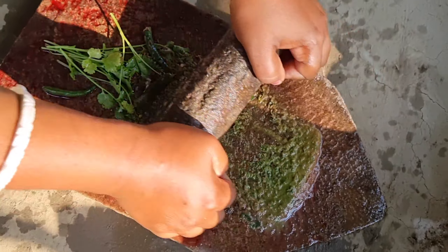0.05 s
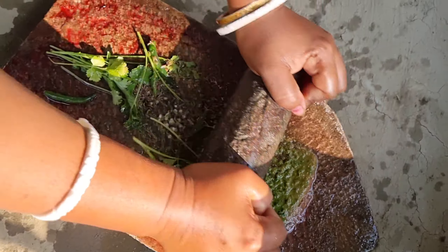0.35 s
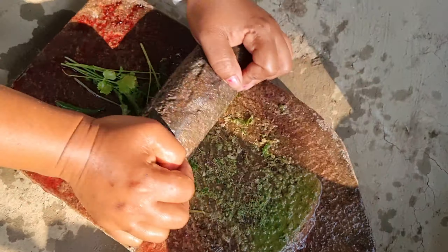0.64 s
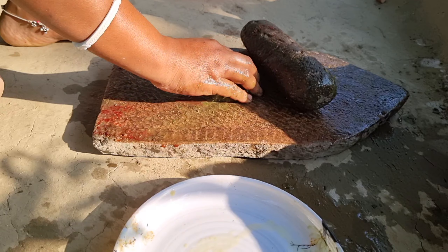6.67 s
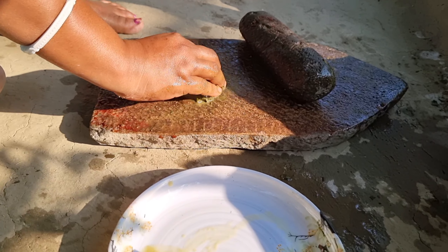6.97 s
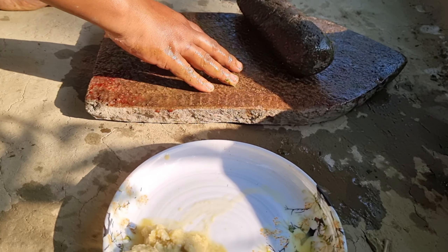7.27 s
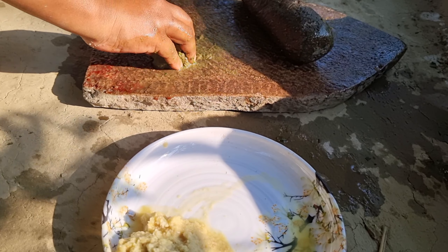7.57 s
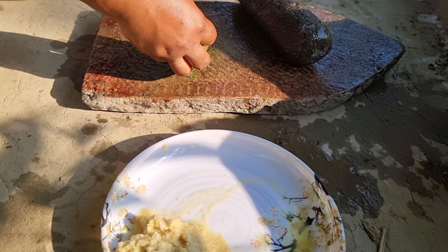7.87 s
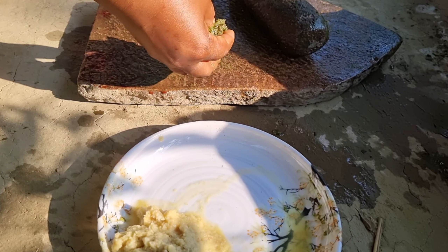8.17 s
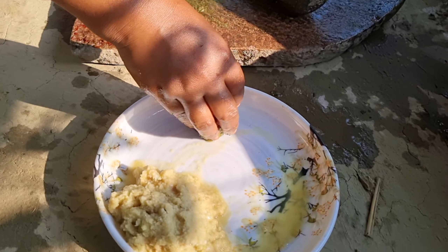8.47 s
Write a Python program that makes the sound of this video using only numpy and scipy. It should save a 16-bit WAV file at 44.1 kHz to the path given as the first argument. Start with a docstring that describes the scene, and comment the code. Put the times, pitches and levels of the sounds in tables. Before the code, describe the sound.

Quick, hissing scrapes of stone on stone crush herbs and spices outdoors, followed by a soft wet wipe and a faraway engine.

```python
"""Gritty, hissing strokes over faint outdoor air and a low hum: a stone roller grinds wet herbs and
spices on a stone slab. The stones judder and ring, seeds crack, the slab rumbles on the ground.
After a pause with a thin whistle and a few nudges, grinding resumes, heard from a second close
position, and the paste squelches. Then it stops: a slow single-cylinder engine thumps far away
and a hand wipes the wet slab."""
import sys
import numpy as np
from scipy import signal
from scipy.fft import rfft, irfft
from scipy.io import wavfile

SR = 44100
rng = np.random.default_rng(int(sys.argv[2]) if len(sys.argv) > 2 else 0)


def generate_wav(sig):
    """Save sig (samples, or channels by samples) to the path in sys.argv[1] as 16-bit PCM at SR."""
    pcm = np.round(np.clip(np.atleast_2d(sig).T, -1, 1) * 32767).astype(np.int16)
    wavfile.write(sys.argv[1], SR, pcm)


N = 380136
T = np.arange(N) / SR
BREAK_S, RESUME_S, STOP_S = 2.605, 2.646, 5.652
CUTOFF_HZ = 16000

# Outdoor air. Each row: frequency in Hz, relative level in dB.
AIR_SPECTRUM = [(25, -19), (65, 3.5), (130, -3.5), (200, -9.5), (300, -7.5), (560, -22), (900, -24.5),
                (1250, -22.5), (1900, -25), (2600, -24.5), (3300, -29.5), (4200, -27), (5800, -36),
                (7200, -29.5), (9200, -45), (16000, -45)]
# Air loudness. Each row: time in seconds, level in dB.
AIR_ENVELOPE = [(0, -50.5), (5.7, -56.5), (6.6, -58.5), (6.75, -66), (7.4, -63), (7.7, -59.5), (8.0, -64.5),
                (8.62, -61)]
# Hum loudness. Each row: time in seconds, level in dB.
HUM_ENVELOPE = [(0, -46), (0.6, -46), (2.3, -38), (2.85, -38), (3.5, -38.5), (4.6, -39), (4.9, -47),
                (5.65, -39)]
# Strokes at listening positions A and B, push and pull in turn. Each row: start in seconds,
# length in seconds, then grit hiss, stone ring and ground rumble in dB.
ROLLER_STROKES_A = [(0.08, 0.091, -23, -34, -29), (0.24, 0.135, -26.5, -37, -37.5),
                    (0.632, 0.088, -23, -40.5, -35.5), (0.786, 0.087, -21, -30, -34),
                    (1.106, 0.097, -24.5, -40, -33.5), (1.288, 0.11, -22, -35, -33.5),
                    (1.601, 0.12, -24, -40.5, -35.5), (1.776, 0.13, -21.5, -33, -35),
                    (2.119, 0.097, -21, -37.5, -32.5), (2.282, 0.119, -18.5, -32, -33.5),
                    (2.576, 0.14, -24.5, -36.5, -31.5)]
ROLLER_STROKES_B = [(3.061, 0.17, -32.5, -50.5, -35), (3.312, 0.083, -26, -37.5, -36),
                    (3.568, 0.086, -27, -38, -33), (3.762, 0.1, -21, -35.5, -34.5),
                    (4.06, 0.094, -25.5, -42, -31.5), (4.262, 0.088, -21, -36.5, -34.5),
                    (4.546, 0.13, -26, -38, -31.5), (4.72, 0.093, -20.5, -34, -33.5),
                    (5.009, 0.13, -29, -40, -38), (5.215, 0.11, -25, -41, -38.5),
                    (5.507, 0.15, -26.5, -41.5, -38.5)]
# Shape of a push, then a pull. Each row: hiss attack and release in dB per second,
# then the fractions of the stroke at which ring and rumble peak.
STROKE_SHAPES_A = [(280, 629.5, 0.24, 0.3), (390, 252, 0.59, .8)]
STROKE_SHAPES_B = [(193.2, 200, 0.55, 0.36), (256, 213, 0.65, 0.8)]
# Slab and roller modes. Each row: frequency in Hz, width in Hz, left and right gain in dB at A,
# left and right gain in dB at B.
STONE_MODES = [(459.7, 120, -14.5, -12, -11.5, -17), (647, 90, -16, -11.5, -5, -8),
               (747, 130, -16.5, -14, -10, -13.5), (1112.5, 50, 2, 2.5, -8.5, 7),
               (1185, 180, -8.5, -11, -8, -3.5), (1380, 79, -8, -10.5, -9.5, -5),
               (1790, 340, -17.5, -18.5, -17, -11), (2695, 40, -9.5, -18.5, -16.5, 1.5),
               (2905, 85, -11, -16.5, -15.5, 2.5), (4610, 170, -6.5, -23, -27, 3.5),
               (7370, 500, -27.5, -35.5, -52, -40.5)]
# Stone catches on bare stone. Each row: start in seconds, length in seconds, level in dB,
# contact pitch in Hz.
STONE_CATCHES = [(0.062, 0.013, -12.5, 1076), (0.073, 0.021, -11, 1090), (0.131, 0.0088, -8, 1300),
                 (0.142, 0.033, -11.5, 1120), (0.1844, 0.011, -12, 1200), (0.295, 0.02, -25, 1366),
                 (0.3713, 0.0027, -13, 2170), (0.672, 0.0069, -25.5, 1200), (1.61, 0.011, -30.5, 1100),
                 (2.289, 0.011, -21.5, 1510), (2.307, 0.021, -25, 1400), (3.052, 0.048, -21, 633),
                 (3.117, 0.011, -22.5, 1140), (3.556, 0.023, -26.5, 600), (4.594, 0.014, -20.4, 1360),
                 (4.649, 0.0087, -26, 1340), (5.012, 0.0031, -25, 1330), (5.063, 0.0042, -26.5, 1290),
                 (5.199, 0.016, -17.5, 1330)]
# Grit hiss. Each row: frequency in Hz, relative left and right level in dB.
GRIT_SPECTRUM_A = [(301, -42.5, -44), (1510, -27, -28), (2134, -16, -15.5), (2800, -9.5, -19.5),
                   (3320, -9.5, -16.5), (4294, -2, -17.5), (6740, -2.14, -16), (8100, -10.5, -19),
                   (8500, -31.5, -20), (9530, -24, -24), (12300, -10, -26.5), (15610, -9.5, -26.5)]
GRIT_SPECTRUM_B = [(298.2, -30.5, -52), (1480, -28.5, -34.5), (2364, -21, -15.5), (2830, -22.5, -14.5),
                   (3770, -24, -6), (3970, -31, -0.7), (5130, -19.5, -2), (6200, -28.5, -16.5),
                   (7460, -21, -34), (9420, -34.5, -25.5), (11850, -28.5, -13), (15500, -37, -22)]
# Slab on the ground. Each row: frequency in Hz, relative level in dB.
RUMBLE_SPECTRUM = [(30, -34.5), (50, -11.5), (80, -2), (130, -2), (195, 0), (235, -10), (290, -20),
                   (400, -18), (800, -51)]
# Coarse spice gives way. Each row: start in seconds, length in seconds, hiss level in dB.
SPICE_CLUMPS = [(0.13, 0.01, -22), (0.256, 0.015, -32), (0.404, 0.053, -32), (1.198, 0.05, -30.5),
                (1.7, 0.02, -22), (2.194, 0.026, -20), (3.057, 0.078, -28.5), (3.911, 0.019, -32),
                (4.607, 0.005, -24.5), (5.435, .022, -29), (5.598, 0.036, -23.5)]
# Seeds and grit snap. Each row: start in seconds, level in dB, brightness in dB.
SEED_CRACKS = [(0.227, -18, 9), (0.2507, -11, 1), (0.252, -11.5, -3), (0.315, -16, 0), (0.4426, -14, 23),
               (0.634, -23, -7), (0.8395, -18, -8), (0.8918, -20, 15), (0.895, -15.5, 13), (1.105, -21, 12),
               (1.6222, -14.5, 13), (1.7992, -15, -8), (2.253, -16, 1), (3.2021, -23.5, 16),
               (3.3038, -17.5, -19), (3.3245, -17.5, -24), (3.3384, -20, 1), (3.3685, -14.5, 9),
               (3.528, -24.5, -24), (3.9214, -18, 8.5), (4.0089, -27.5, -8), (4.105, -21, -3),
               (4.247, -16, 5), (4.41, -24, 1), (4.6, -15, -25), (4.8398, -11, 13), (5.2309, -14, -23),
               (5.437, -28, -23), (5.448, -25, -20), (5.6192, -23, -5)]
# Whistle loudness. Each row: time in seconds, level in dB.
WHISTLE_ENVELOPE = [(2.65, -60), (2.69, -46), (2.735, -60), (2.77, -44), (2.88, -47), (2.98, -53),
                    (3.02, -85)]
# The roller is settled on the slab. Each row: start in seconds, level in dB.
ROLLER_NUDGES = [(2.744, -32.5), (2.813, -39), (2.847, -38), (2.895, -40)]
# Wet paste crackle. Each row: frequency in Hz, relative level in dB.
WET_SPECTRUM = [(700, -26), (1300, -6), (1900, -4), (3000, -8.5), (5500, 1.5), (7500, -2), (9500, -8),
                (13000, -2), (16000, -11)]
# Paste squelches as the roller turns back. Each row: start in seconds, length in seconds,
# first and last pitch in Hz, level in dB.
PASTE_SQUELCHES = [(3.244, 0.06, 1700, 2050, -49), (3.924, 0.066, 2700, 2070, -49),
                   (5.385, 0.048, 2700, 2090, -49)]
# Engine speed. Each row: time in seconds, firings per second.
FIRING_RATE = [(5.735, 9.0), (6.2, 8.36), (7.0, 8.31), (7.55, 9.18), (8.25, 8.99), (8.6, 10.12)]
# The distant engine's loudness dips suddenly, then recovers.
# Each row: time in seconds, exhaust thump in dB, silencer ring in dB.
ENGINE_ENVELOPE = [(5.7, -50.5, -51), (6.57, -54, -50), (6.7, -61.5, -62), (7.15, -52.5, -56),
                   (8.15, -55, -58.5), (8.6, -54, -58.5)]
# Hand on the slab. Each row: peak time in seconds, rise and fall in dB per second, level in dB.
HAND_WIPES = [(6.22, 99, 108, -50), (6.228, 600, 700, -49), (6.278, 1200, 500, -45.5),
              (6.58, 251, 201, -74), (7.73, 242, 131, -72)]


def from_db(db):
    """Decibels to gain."""
    return 10 ** (np.asarray(db) / 20)


def unit_rms(x):
    """Scale to unit power."""
    return x / np.sqrt(np.mean(x ** 2) + 1e-20)


def envelope(rows):
    """Gain curve from rows of seconds and dB."""
    return from_db(np.interp(T, *np.transpose(rows)))


def during(start_s, end_s, ramp_s=0.004):
    """Gate with short ramps."""
    return np.clip(np.minimum(T - start_s, end_s - T) / ramp_s, 0, 1)


def held_db(start_s, length_s, attack_db_per_s, release_db_per_s):
    """Attack, hold at 0 dB, release."""
    early_s, late_s = np.maximum(start_s - T, 0), np.maximum(T - start_s - length_s, 0)
    return -attack_db_per_s * early_s - release_db_per_s * late_s


def power_sum(curves_db):
    """Joint gain of unrelated sounds."""
    return np.sqrt(sum(from_db(np.maximum(curve, -200)) ** 2 for curve in curves_db))


def drift(rate_hz):
    """Slow random curve of unit spread."""
    points = rng.standard_normal(N // 8)
    return np.interp(T * rate_hz, np.arange(len(points)), points) * np.sqrt(3 / 2)


def delay(x, lag_s):
    """Delay a mono signal; a negative lag advances it."""
    return np.interp(T - lag_s, T, x)


def late_left(x, lag_s):
    """Sound from the right reaches the left side later; negative for sound from the left."""
    return np.array([delay(x[0], lag_s), x[1]])


def cut(x, hz, kind):
    """Second-order low- or high-pass."""
    return signal.sosfilt(signal.butter(2, hz, kind, fs=SR, output="sos"), x + 1e-18)


def resonate(x, hz, width_hz):
    """Resonance with unit peak gain."""
    r = np.exp(-np.pi * width_hz / SR)
    feedback = [1, -2 * r * np.cos(2 * np.pi * hz / SR), r * r]
    return signal.lfilter(np.array([1, 0, -1]) * (1 - r * r) / 2, feedback, x + 1e-18)


def colour(x, spectrum):
    """Minimum-phase filter of unit power; two dB columns give left and right."""
    hz, *columns_db = np.transpose(spectrum)
    log_hz = np.log(np.maximum(np.fft.rfftfreq(4096, 1 / SR), 1))
    magnitude = from_db([np.interp(log_hz, np.log(hz), db) for db in columns_db])
    cepstrum = irfft(np.log(magnitude))
    fold = 1 + np.sign(np.fft.fftfreq(cepstrum.shape[1]))
    response = irfft(np.exp(rfft(cepstrum * fold)))
    response /= np.sqrt(np.sum(response ** 2) / len(columns_db))
    return signal.fftconvolve(np.atleast_2d(x), response, axes=1)[:, :N]


def grains(per_s, spread_db, life_s):
    """Tiny fractures of uneven size, each a short puff of stereo noise."""
    sizes = from_db(spread_db * np.minimum(rng.exponential(1, N), 5))
    born = rng.random(N) < per_s / SR
    power = signal.lfilter([1], [1, -np.exp(-2 / (life_s * SR))], born * sizes ** 2 / per_s + 1e-18)
    return unit_rms(np.sqrt(power) * rng.standard_normal((2, N)))


def air(wide_above_hz=400, side_db=1.0):
    """Outdoor background: centred bass, wide treble."""
    mid, side = colour(rng.standard_normal((2, N)), AIR_SPECTRUM)
    side = from_db(side_db) * cut(side, wide_above_hz, "high")
    return envelope(AIR_ENVELOPE) * (mid + side * [[1], [-1]])


def hum(tone_hz=64.6, waver_hz=2.5, tone_db=-1, flutter_db=6, drone_hz=52, drone_db=-8):
    """A low tone wavers in pitch and strength over a dull drone."""
    phase = 2 * np.pi * np.cumsum(tone_hz + waver_hz * drift(16)) / SR
    tone = from_db(tone_db - flutter_db * drift(14)) * np.sqrt(2) * np.sin(phase)
    noise = rng.standard_normal(N) + 0.54 * rng.standard_normal((2, N))
    drone = unit_rms(cut(resonate(noise, drone_hz, width_hz=25), 2 * drone_hz, "low"))
    return envelope(HUM_ENVELOPE) * (tone + from_db(drone_db) * drone)


def stone_ring(force, position, sway_db=3.5, sway_hz=10):
    """A force rings the stones; each mode swells and fades as the roller travels."""
    out, steps = 0, sway_hz * T[:force.shape[-1]]
    for k, (hz, width_hz, *levels_db) in enumerate(STONE_MODES):
        sides = from_db(np.reshape(levels_db, (2, 2))[position])
        sway = from_db(sway_db * rng.standard_normal(int(steps[-1]) + 2))
        coupling = np.interp(steps, np.arange(len(sway)), sway)
        out = out + (-1) ** k * sides[:, None] * resonate(force * coupling, hz, width_hz)
    return out


def judders(position, slips_per_s=900, first_slip=2.3, contact_db=8, click_db=-16):
    """A hard first contact and a short run of slips ring the stones."""
    out, size = np.zeros((2, N)), SR // 8
    t = T[:size]
    for start_s, length_s, db, hz in STONE_CATCHES:
        slips = rng.standard_normal(size) * (0.28 + (rng.random(size) < slips_per_s / SR))
        force = slips * np.exp(-(t / length_s) ** 4)
        force[0] = first_slip
        contact = from_db(contact_db) * resonate(force, hz, 0.071 * hz)  # contact stiffness sets pitch
        sound = stone_ring(1.1 * force + contact, position) + from_db(click_db) * contact
        rms = np.sqrt(np.mean(sound[:, t < length_s + 0.008] ** 2))
        out[:, round(start_s * SR):][:, :size] += sound * from_db(db) / rms
    return out


def stalls(strokes, dip_db=4, width_s=0.013, gap_share=0.37):
    """Hiss gain: the roller stalls briefly between push and pull."""
    dips = 0
    for (start_s, length_s, *_), (pull_s, *_) in zip(strokes[::2], strokes[1::2]):
        end_s = start_s + length_s
        stall_s = end_s + gap_share * (pull_s - end_s)
        dips = dips + np.exp(-((T - stall_s) / width_s) ** 2)
    return from_db(-dip_db * dips)


def stroke_gains(strokes, shapes, ring_sag_db=5, rumble_sag_db=4.5, clump_db_per_s=1100):
    """Grit hisses evenly while the roller slides; ring and rumble swell and sink with its speed."""
    hiss, ring, rumble = [-49.5], [-71.5], [-57.5]  # dB, creeping between strokes
    for k, (start_s, length_s, hiss_db, ring_db, rumble_db) in enumerate(strokes):
        attack, release, ring_peak, rumble_peak = shapes[k % 2]
        travel = (T - start_s) / length_s
        hiss.append(hiss_db + held_db(start_s, length_s, attack, release))
        ring.append(ring_db - ring_sag_db * (2 * (travel - ring_peak)) ** 2)
        rumble.append(rumble_db - rumble_sag_db * (2 * (travel - rumble_peak)) ** 2)
    for start_s, length_s, db in SPICE_CLUMPS:
        hiss.append(db + held_db(start_s, length_s, clump_db_per_s, clump_db_per_s))
    return power_sum(hiss) * stalls(strokes), power_sum(ring), power_sum(rumble)


def crunch(per_s, tick_db=-4.5, tuned_db=-4, lowest_hz=2500, bands=4):
    """Grit breaks in broad ticks and in grains that ring in a band set by their size."""
    edges_hz = np.geomspace(lowest_hz, CUTOFF_HZ, bands + 1)
    out = from_db(tick_db) * grains(2 * per_s, spread_db=2.5, life_s=0.00051)
    for low_hz, high_hz in zip(edges_hz, edges_hz[1:]):
        band = signal.butter(2, [low_hz, high_hz], "band", fs=SR, output="sos")
        out += from_db(tuned_db) * signal.sosfilt(band, grains(per_s, spread_db=3.5, life_s=9 / low_hz))
    return out


def flank_echo(hiss, path_s=0.00052, wander_s=0.00016, echo_db=-9):
    """The roller's flank reflects the hiss over a moving path, shifting its colour."""
    lag_s = path_s + wander_s * drift(11)
    echo = np.array([delay(side, lag_s) for side in hiss])
    return (hiss + from_db(echo_db) * echo) / np.hypot(1, from_db(echo_db))


def grinding(strokes, shapes, grit_spectrum, position, hiss_db, ring_db, rumble_db):
    """Each stroke crushes grit, rubs the stones into ringing and shakes the slab on the ground."""
    hiss, ring, rumble = stroke_gains(strokes, shapes)
    lumps = from_db(1.63 * drift(90))  # the roller rides over uneven paste
    grains_per_s = 500 + 5000 * hiss / hiss.max()  # harder strokes break more grains
    grit = flank_echo(colour(crunch(grains_per_s), grit_spectrum))
    crush = from_db(hiss_db) * hiss * lumps * grit
    mid, side = lumps * grains(per_s=1400, spread_db=-0.5, life_s=0.0009)
    rub = unit_rms(stone_ring(mid + 0.22 * side * [[1], [-1]], position))
    ground = colour(rng.standard_normal(N), RUMBLE_SPECTRUM)
    ground = ground + 0.19 * colour(rng.standard_normal((2, N)), RUMBLE_SPECTRUM)
    body = from_db(ring_db) * ring * rub + from_db(rumble_db) * rumble * ground
    return crush + cracks(grit_spectrum) + late_left(body + judders(position), lag_s=0.00007)


def cracks(grit_spectrum, dull_s=0.0051, bright_s=0.0013, split_hz=7500, gain_db=2, treble_db=4.5):
    """A seed snaps, dull or bright, and its pieces crumble briefly."""
    dull, bright, size = np.zeros(N), np.zeros(N), SR // 20
    t = T[:size]
    crumble = from_db(-19) * np.exp(-t / 0.015)
    dull_decay, bright_decay = np.exp(-t / dull_s) + crumble, np.exp(-t / bright_s) + crumble
    for start_s, db, bright_db in SEED_CRACKS:
        strength = from_db(db + gain_db) / np.hypot(1, from_db(bright_db))
        dull[round(start_s * SR):][:size] += strength * dull_decay
        bright[round(start_s * SR):][:size] += strength * from_db(bright_db + treble_db) * bright_decay
    noise = colour(rng.standard_normal((2, N)), grit_spectrum)
    treble = cut(cut(noise, split_hz, "high"), split_hz, "high")
    return dull * unit_rms(cut(noise, split_hz, "low")) + bright * unit_rms(treble)


def whistle(hz=7380):
    """A narrow band of noise, high and to the right."""
    band = resonate(rng.standard_normal((2, N)), hz, width_hz=130)
    tone = unit_rms(resonate(band, hz, width_hz=260))
    end_s = WHISTLE_ENVELOPE[-1][0]
    return envelope(WHISTLE_ENVELOPE) * tone * from_db([[-16], [-4]]) * (T < end_s)


def nudges(thud_s=0.012, tick_s=0.013, tick_db=-8):
    """The roller bumps the slab softly, with a tick of wet grit."""
    thud, tick = np.zeros((2, N))
    for start_s, db in ROLLER_NUDGES:
        onset, age_s = from_db(db) * (T >= start_s), np.abs(T - start_s)
        thud += onset * np.exp(-age_s / thud_s)
        tick += onset * np.exp(-age_s / tick_s)
    wet_grit = colour(grains(per_s=1500, spread_db=-1, life_s=0.0006), WET_SPECTRUM)
    return thud * colour(rng.standard_normal(N), RUMBLE_SPECTRUM) + from_db(tick_db) * tick * wet_grit


def squelches(blur_hz=70, left_db=-7):
    """A pocket in the paste opens or closes; its hissing resonance glides."""
    out = np.zeros(N)
    for start_s, length_s, from_hz, to_hz, db in PASTE_SQUELCHES:
        size = int(length_s * SR)
        phase = 2 * np.pi * np.cumsum(np.linspace(from_hz, to_hz, size)) / SR
        rustle = unit_rms(cut(rng.standard_normal(SR // 8), blur_hz, "low")[-size:])
        swell = 2 * from_db(db) * np.sin(np.linspace(0, np.pi, size))
        out[round(start_s * SR):][:size] += swell * rustle * np.sin(phase)
    return out * from_db([[left_db], [0]])


def firings(thump_spread_db=0.2, ring_spread_db=1.9):
    """One slightly uneven firing per cycle. Each row: time in seconds, thump and ring in dB."""
    running_s = T[T >= FIRING_RATE[0][0]]
    cycles = np.cumsum(np.interp(running_s, *np.transpose(FIRING_RATE))) / SR
    times_s = np.interp(np.arange(int(cycles[-1]) + 1), cycles, running_s)
    envelope_s, thump_db, ring_db = np.transpose(ENGINE_ENVELOPE)
    chance = rng.standard_normal((len(times_s), 2))
    thumps_db = np.interp(times_s, envelope_s, thump_db) - thump_spread_db * chance[:, 0]
    rings_db = np.interp(times_s, envelope_s, ring_db) + ring_spread_db * chance[:, 1]
    return zip(times_s, thumps_db, rings_db)


def exhaust_puff(t, hz, swell_s, db):
    """A pressure pulse swells and dies away, slightly off pitch each time."""
    swell = np.sqrt(2) * from_db(db) * t / swell_s * np.exp(1 - t / swell_s)
    return swell * np.sin(2 * np.pi * hz * (1 + 0.028 * rng.standard_normal()) * t)


def engine(silencer_lag_s=0.023, clatter_s=0.023, clatter_hz=2650, clatter_db=-11):
    """Each firing thumps, rings the silencer and clatters faintly; walls return two echoes."""
    puffs, knocks, size = np.zeros(N + SR), np.zeros(N + SR), SR // 10
    t = T[:size]
    for start_s, thump_db, ring_db in firings():
        thump = exhaust_puff(t, hz=84, swell_s=0.0054, db=thump_db + 4)
        ring = exhaust_puff(t, hz=285, swell_s=0.0042, db=ring_db + 2)
        puffs[round(start_s * SR):][:size] += thump
        puffs[round((start_s + silencer_lag_s) * SR):][:size] += ring
        knocks[round(start_s * SR):][:size] += from_db(ring_db + clatter_db) * np.exp(-t / clatter_s)
    exhaust = cut(puffs[:N], 38, "high")
    echoes = sum(delay(exhaust, lag_s) * from_db([[db + pan_db], [db - pan_db]])
                 for lag_s, db, pan_db in ((0.033, -7.5, 0.79), (0.062, -20, -2)))
    clatter = knocks[:N] * unit_rms(resonate(rng.standard_normal((2, N)), clatter_hz, width_hz=550))
    return late_left(exhaust + echoes + clatter, lag_s=-0.00038)


def wipe(left_db=-3, right_db=2):
    """Wet paste crackles under the fingers."""
    crackle = colour(grains(per_s=3700, spread_db=4.5, life_s=0.0011), WET_SPECTRUM)
    pressure = power_sum(db + held_db(peak_s, 0, rise, fall) for peak_s, rise, fall, db in HAND_WIPES)
    return pressure * crackle * from_db([[left_db], [right_db]])


def scene():
    """Two spells of grinding, split by a brief silence; then engine and wiping."""
    first = grinding(ROLLER_STROKES_A, STROKE_SHAPES_A, GRIT_SPECTRUM_A,
                     position=0, hiss_db=0.9, ring_db=4.0, rumble_db=1.0)
    second = grinding(ROLLER_STROKES_B, STROKE_SHAPES_B, GRIT_SPECTRUM_B,
                      position=1, hiss_db=-0.44, ring_db=8.0, rumble_db=1.1)
    outdoors, low_hum = air(), hum()
    second += nudges() + squelches() + whistle()
    return (during(0, BREAK_S) * (first + low_hum + outdoors)
            + during(RESUME_S, STOP_S) * (second + low_hum + outdoors)
            + during(STOP_S, np.inf) * (engine() + wipe() + outdoors))


def record(dry):
    """Soft clip, then a steep low-pass."""
    return signal.sosfilt(signal.ellip(10, 0.1, 80, CUTOFF_HZ, fs=SR, output="sos"), np.tanh(dry))


dry = scene()
out = record(dry)
generate_wav(out)
```